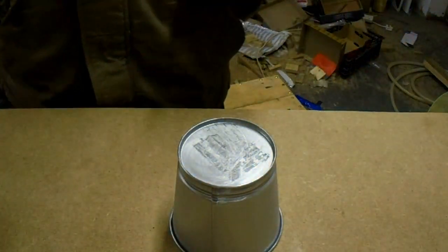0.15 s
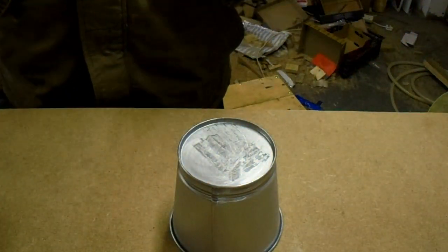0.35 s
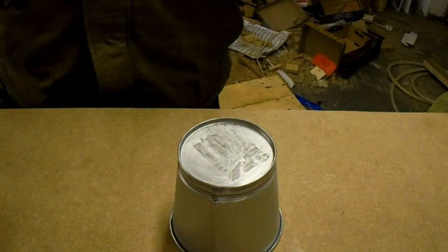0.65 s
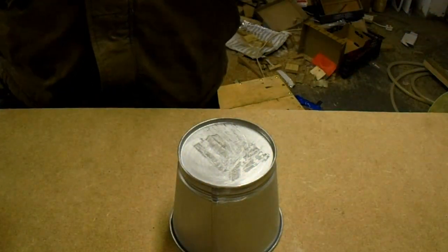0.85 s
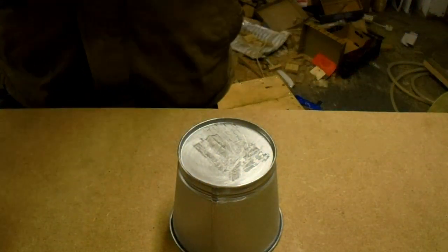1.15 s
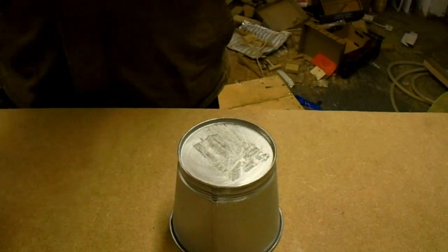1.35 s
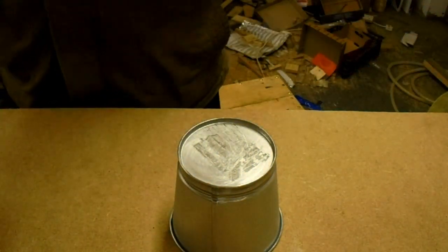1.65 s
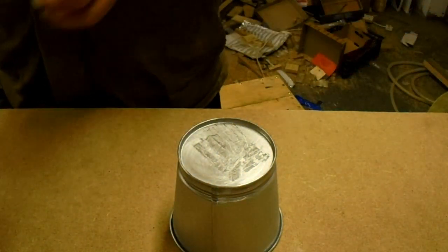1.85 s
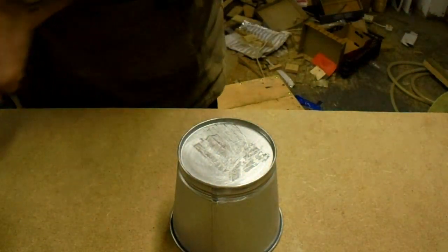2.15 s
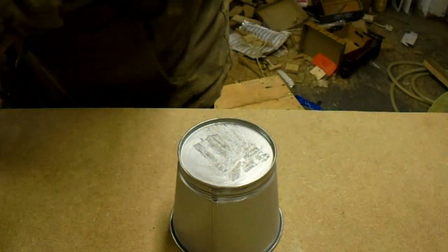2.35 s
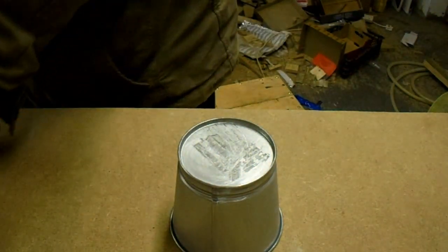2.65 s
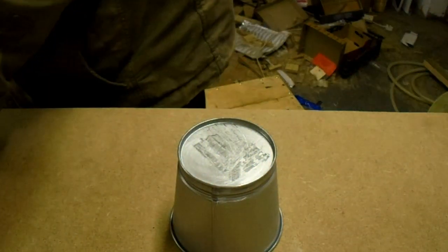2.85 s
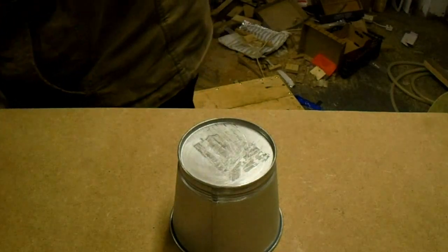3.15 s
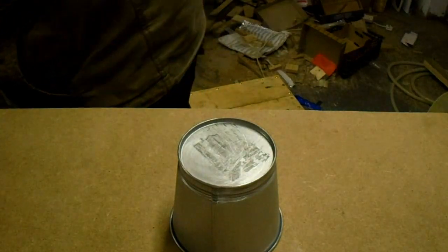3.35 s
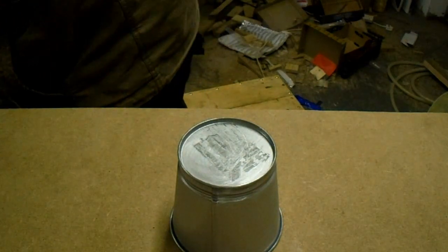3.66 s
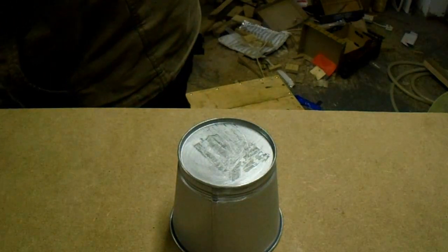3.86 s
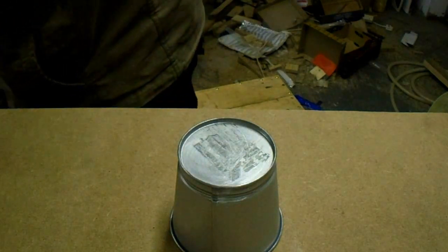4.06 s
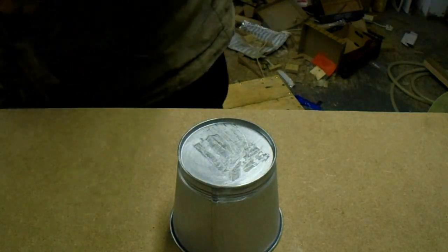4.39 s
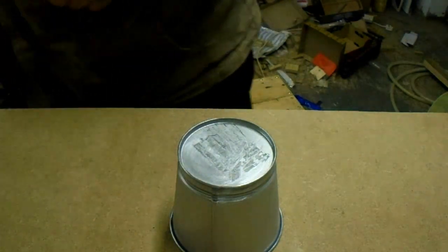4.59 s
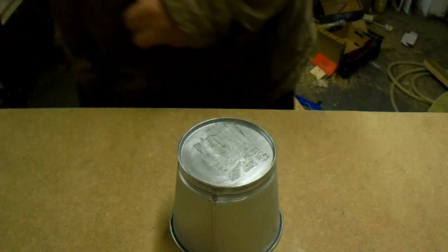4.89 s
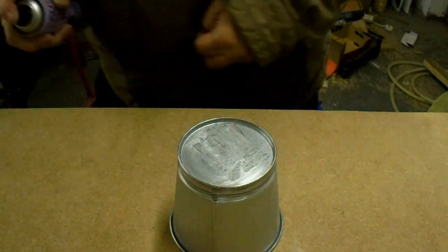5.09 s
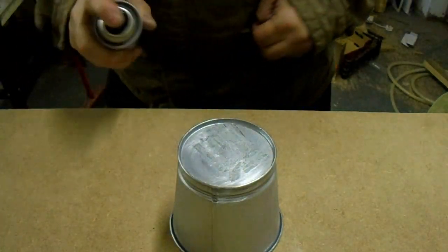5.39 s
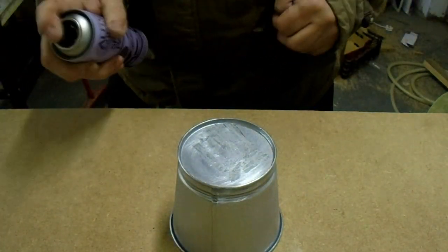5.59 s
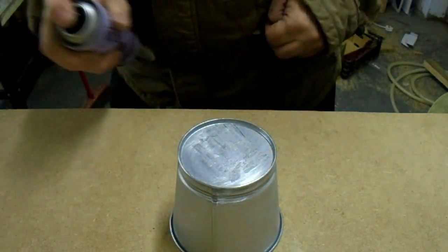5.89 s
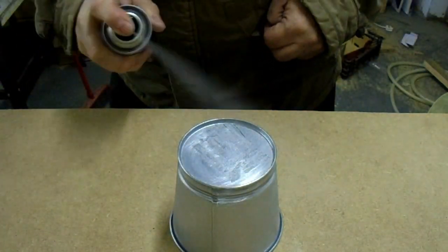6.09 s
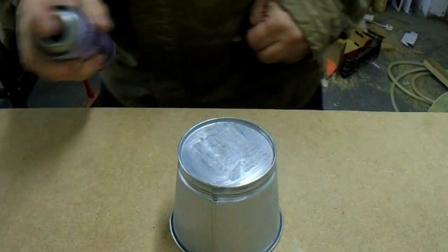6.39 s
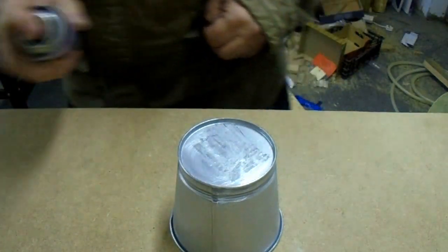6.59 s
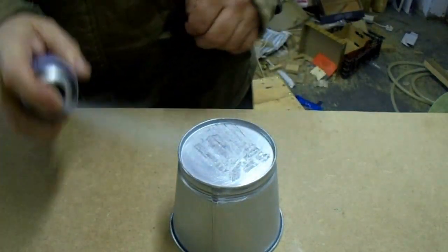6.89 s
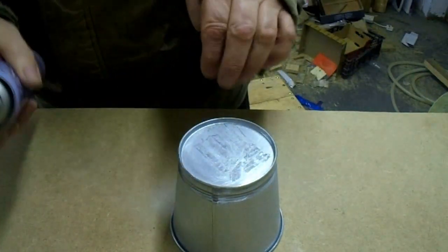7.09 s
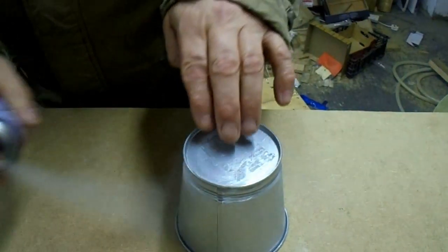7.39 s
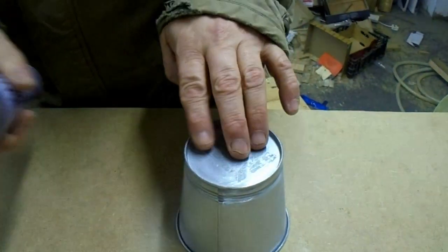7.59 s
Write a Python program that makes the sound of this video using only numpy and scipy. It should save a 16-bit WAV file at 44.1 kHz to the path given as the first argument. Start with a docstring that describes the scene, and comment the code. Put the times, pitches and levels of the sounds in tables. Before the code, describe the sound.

An aerosol paint can is shaken close to the microphone, its steel ball clacking, scraping and skittering unevenly through the paint. The can knocks against a wooden bench a few times. The shaking eases, the bench thuds and shudders, and three short, softer hisses of spray follow among scattered clicks. A low hum sits behind it all in a small workshop.

```python
"""A workshop, with the microphone close to an aerosol can and a low hum behind it.
The can is shaken from the start: its steel ball clacks, scrapes and skitters through the paint.
Near 1.5 s and again from 3.6 s the can is knocked on the bench, ringing the board. From 5.4 s the
shaking eases, the bench frame thuds and shudders, and after 6 s three short bursts of paint hiss out.
It is all heard through a small camera that samples at a low rate and joins the samples by straight lines."""
import sys
import numpy as np
from scipy import signal
from scipy.fft import rfft, irfft
from scipy.io import wavfile
from scipy.ndimage import uniform_filter1d

SR = 44100
rng = np.random.default_rng(int(sys.argv[2]) if len(sys.argv) > 2 else 0)


def int16_out(signal):
    """Quantize to a 16-bit WAV file."""
    q = np.round(np.clip(np.atleast_2d(signal).T, -1, 1) * 32767)
    wavfile.write(sys.argv[1], SR, q.astype(np.int16))


N = 341334

# The ball striking the can, close up. Each row: start in seconds, strength in dB, low wall modes in dB,
# high wall modes in dB, following clatter in dB relative to the strength.
BALL_BLOWS = [(0.0579, -4, -6, -13, -21), (0.0649, -5.5, -8, -7.5, -33), (0.0882, 4.5, -13, -10, -28),
              (0.0925, -5, -13, 1, -25), (0.1048, -1.5, -14, -10, -38), (0.1245, -5.5, -5, -20, -26),
              (0.1684, -4, -24, -14, -28), (0.185, -6, -11, -15, -25.5), (0.1952, -12, -15, -23, -30),
              (0.241, -14.5, 4, -21, -25), (0.2923, -22.5, 6, -20, -32), (0.3665, 7.5, -19, -9.5, -29),
              (0.3721, -5.5, -15, -3, -31), (0.4295, -5.5, -11.5, -11, -24), (0.445, -11, -18, -16, -32),
              (0.4946, -0.5, -12.5, -22.5, -28), (0.5019, -13, -10, -6, -35), (0.5861, -14, -2, -15, -26),
              (0.6636, 1, -16, -12, -21), (0.6757, 2, -13, -7.5, -32), (0.6896, -4.5, -16, 0, -25),
              (0.723, -3.5, -20, -15, -30.5), (0.7841, -5.5, -19, -15.5, -24), (0.8704, -29, -9, -24, -16),
              (0.9423, 2.5, -26, 1, -28.5), (0.9558, -1.5, -14, -2, -28.5), (0.996, -8, -27, -20, -29),
              (1.0306, -19, -18, -18, -27), (1.0719, -9.5, -24, -10, -23.5), (1.112, -22, -8, -25, -35),
              (1.1478, -25, -16.5, -18, -24), (1.1712, -23, 0, -25, -25), (1.2356, -22.5, -10, 0, -27),
              (1.2989, -12, -2.5, -23, -36), (1.3284, -22, -1, -31, -34), (1.4117, -27, -7, -26, -15),
              (1.4547, -12, -2, -2, -12), (1.4854, -5.5, -23, -18, -36), (1.5825, -17.5, -18, -15, -37),
              (1.6207, -24.5, -1, -8, -14), (1.8746, -27, -11, 2, -9), (1.9109, 2.5, -16, -5, -32),
              (1.9201, 2.5, -13, -3, -35), (1.9292, 3.5, -38, -12, -42), (1.9942, -1, -32, -29.5, -22),
              (2.0009, -5.5, -21, -18, -42), (2.0557, -18, -13, -5, -19), (2.1066, -24, 1, -25, -31),
              (2.1843, 0.5, -21, -10, -25.5), (2.2061, -7, -18, -7, -24), (2.2982, -8.5, -15, -11, -23),
              (2.3222, -4.5, -18, -20, -38), (2.3448, -14, -11, -18, -22), (2.4403, -17.5, -3, -9, -29),
              (2.4683, -24, -15, -9, -15), (2.4913, -13, -24, -7, -26), (2.509, -6.5, -26, -5, -33),
              (2.5153, -10, -24, -11, -27), (2.536, -13, -24, -20, -27), (2.5815, -9.5, -20, -27, -22),
              (2.5972, -8.5, -30, -19, -28), (2.6393, -21, -9, -18, -20), (2.656, -18.5, -11, -18, -22),
              (2.7715, 4.5, -19, -4, -38), (2.827, 0.5, -21, 5, -44), (2.843, -13, -7, -10, -32),
              (2.8537, -10, -15, -5, -37), (2.9116, -10, -21, -16, -20.5), (2.92, -15, -19, -24, -20),
              (3.1161, -5, -20, -11, -28), (3.1428, -12.5, -21, -1, -27), (3.271, -11.5, -27, 0, -27),
              (3.3322, -20, -18, -14, -22), (3.4031, -18, -20, -22, -16.5), (3.5952, -7.5, 13, -25, -30),
              (3.686, -15, -12, -10, -17), (3.726, -20.5, -3, -21, -16), (3.828, -20, -4, -18, -5),
              (3.8838, -14.5, -2, -24, -19), (4.069, -25, -12, -11, -27), (4.087, -10, -7, 0, -23),
              (4.1106, -7.5, -8, 7, -18.5), (4.2388, -11, -9, -5, -19), (4.342, -44, -16, -19, -29),
              (4.4104, -2, -34, -10, -25), (4.4323, -14, -21, -7, -36), (4.466, -0.5, -39, -9, -45),
              (4.527, -6, -31, -7.5, -35), (4.555, -18, -32, -17.5, -21), (4.6626, -9.5, -25, -14, -30),
              (4.6762, -11.5, -34, -14.5, -22.5), (4.742, -22.5, -10, -20.5, -27),
              (4.7905, -0.5, -28, 2, -38), (4.799, -1.5, -21, -10.5, -26), (4.826, -12, -23, -12, -29),
              (4.8746, -12, -31, -11.5, -27), (4.8898, -13, -24, -8, -30), (4.9152, -19.5, -23, -22, -28),
              (5.0068, -3.5, -24, -22, -27.5), (5.065, -25, -20, -21, -14), (5.2082, -12, -25, -10.5, -34),
              (5.2454, -23.5, -23, -17.5, -23), (5.3645, -9, -37, -17, -24.5), (5.3856, -19, -23, -22, -27),
              (5.44, -22, -24, -9.5, -23), (5.4824, -12, -38, -15, -41), (5.5305, -15.5, -23, -13.5, -33),
              (5.5565, -21, -25, -13, -28), (5.5766, -21, -25, -8.5, -35), (5.6003, -23.5, -33, -12, -23),
              (6.1519, -29.5, -30, -8, -29), (6.2358, -16.5, -26, -19, -25), (6.2925, -14.5, -23, -20, -26),
              (6.4168, -22, -18, -22, -27), (6.6518, -9.5, -17, -10.5, -24.5), (6.6816, -25, -27, -7, -30),
              (7.1227, -15, -16, -27, -39), (7.1584, -16, -21, -15, -27), (7.17, -10.5, -13, -25, -25),
              (7.2459, -16, -18, -17, -26.5), (7.2774, -36, -17, -9, -27), (7.2956, -23.5, -22, -6, -31),
              (7.3255, -21, -22, -27, -33), (7.3851, -30, -13, -31, -33), (7.417, -28, -14, -16, -21),
              (7.5953, -13.5, -27, -26, -31), (7.6266, -11, -22, -20, -26), (7.6852, -26, -9, -21, -27),
              (7.7308, -18.5, -27, -9, -27)]
# The can wall, damped by hand and paint. Each row: frequency in Hz, width in Hz, level in dB.
WALL_MODES = [(750, 500, -20), (1000, 500, -15), (1300, 550, -10), (1710, 550, -5), (2250, 800, -2),
              (2800, 800, 0), (3250, 900, 1), (3700, 1000, 4), (4280, 1000, 6), (4850, 1100, 7),
              (5350, 1100, 7)]
# Ball and paint sliding along the wall. Each row: time in seconds, level in dB.
SKITTER_LEVELS = [(0.03, -48), (0.27, -46.5), (0.89, -47.5), (1.14, -57.5), (1.5, -44.5), (1.65, -50),
                  (1.8, -57), (1.91, -42.5), (2.46, -52.5), (3.0, -42), (3.4, -44), (3.6, -48.5),
                  (3.78, -33), (3.91, -60.5), (4.2, -39.5), (4.9, -52.5), (5.25, -54), (5.42, -62),
                  (5.7, -62.5), (6.101, -78), (6.49, -46.5), (6.74, -69)]
# The tone of that sliding. Each row: frequency in Hz, level in dB.
SKITTER_SPECTRUM = [(210, -50), (350, -27.5), (860, -12), (954, -9.5), (1440, -9), (1680, -6.5),
                    (2540, -5.5), (4170, -5.5), (5500, -5.5), (7150, -41), (12100, -120)]
# Short scrapes inside the can. Each row: start in seconds, strength in dB, pitch in Hz.
CAN_SCRAPES = [(0.0654, -8, 1665), (0.0947, -25.5, 1620), (0.168, -18.5, 1280), (0.3638, -26, 1270),
               (0.4946, -16.5, 1790), (0.5864, -17, 1780), (0.6651, -20, 1740), (0.7826, -24.5, 1250),
               (0.87, -23, 1800), (1.241, -35.5, 2430), (1.3, -32, 2460), (1.36, -34.5, 2010),
               (1.4542, -14.5, 1060), (1.876, -19.5, 1930), (1.9934, -17.5, 1960), (2.127, -20.5, 1830),
               (2.174, -23, 1870), (2.2997, -20, 1930), (2.4398, -26, 1590), (2.5358, -20.5, 1350),
               (2.8267, -21, 1810), (3.279, -37, 2900), (3.41, -28, 2950), (3.5986, -9.5, 1320),
               (3.829, -15, 1320), (3.8875, -28, 1240), (4.069, -25.5, 1970), (4.1056, -21, 1155),
               (4.2393, -19.5, 2010), (4.4094, -21, 2300), (4.468, -24, 2210), (4.556, -22.5, 2140),
               (4.6628, -19.5, 2170), (4.796, -23, 2080), (5.008, -24.5, 2960), (5.365, -27.5, 2970),
               (5.483, -31.5, 2940)]
# Presses of the valve. Each row: start in seconds, length in seconds, level in dB.
SPRAY_BURSTS = [(6.143, 0.25, -36), (6.961, 0.2, -33), (7.409, 0.21, -32.5)]
# Nozzle and jet as they reach the microphone. Each row: frequency in Hz, level in dB.
JET_SPECTRUM = [(250, -16.5), (640, -22.5), (1200, -10), (1500, -17.5), (1900, -6.5), (2270, -2),
                (2700, -6.5), (3000, -8.5), (3200, -5), (3450, -14.5), (3720, -4), (4000, -9.5), (4400, -3),
                (4900, -4), (5400, -7), (6200, -22)]
# The can meeting the bench. Each row: start in seconds, strength in dB, pivot frequency in Hz,
# mode gain in dB per octave away from the pivot, after-shake T60 in seconds.
BENCH_KNOCKS = [(1.455, -7.5, 777, -29, 0.07), (1.486, -27, 1000, -8.5, 0.23),
                (3.593, -4.5, 900, 6.5, 0.41), (3.828, -4.5, 660, 5.5, 0.57), (3.887, -9, 710, 7, 0.74)]
# The bench top. Each row: frequency in Hz, width in Hz, level in dB.
BOARD_MODES = [(210, 290, -7.5), (303, 330, -9), (462, 120, 2), (659, 21, -9), (772, 125, 16.5),
               (900, 74, -25), (1155, 16, -4), (1320, 110, 8), (1870, 200, 1.5), (2360, 770, 12)]
# Dull thuds of the bench frame. Each row: start in seconds, strength in dB, pitch in Hz, T60 in seconds.
FRAME_THUDS = [(1.234, -36.5, 249, 0.51), (1.366, -32.5, 207, 0.57), (5.446, -36.5, 210, 0.69),
               (5.505, -40.5, 219, 0.4), (5.653, -35.5, 202, 0.31), (5.872, -35.5, 210, 0.28),
               (7.252, -29.5, 158, 0.14), (7.325, -26.5, 149, 0.47)]
# Shoves against the frame. Each row: start in seconds, level in dB.
FRAME_SHOVES = [(6.731, -15), (6.8, -28.5), (6.863, -29.5), (6.993, -35.5)]
# The frame's resonances. Each row: frequency in Hz, width in Hz, peak level in dB.
FRAME_MODES = [(155, 76, -11), (219, 28, -3), (270, 53, -7), (308.7, 11, 4), (382, 13, -33)]
# The frame's rattle. Each row: frequency in Hz, level in dB.
RATTLE_SPECTRUM = [(240, -35), (400, -5), (989, -8), (1120, -12), (1440, -18.5), (2750, -21.5),
                   (4000, -21.5), (5200, -26.5), (8800, -120)]
# The workshop's short echo. Each row: frequency in Hz, T60 in seconds.
ROOM_DECAY = [(300, 0.47), (1300, 0.15), (4000, 0.13)]
# Room tone behind the bench. Each row: frequency in Hz, level in dB.
AIR_SPECTRUM = [(5.9, -29.5), (10, -14.5), (59, 4), (97, -8.5), (133, 0.5), (238, -10.5), (326, -9.5),
                (460, -24.5), (615, -8.5), (913, -22), (989, -16), (1470, -24.5), (1770, -20), (4450, -28),
                (5500, -28), (7150, -69), (12100, -120)]
# The background hum. Each row: frequency in Hz, width in Hz, level in dB.
HUM_BANDS = [(58.6, 3.1, -54), (126, 10, -60)]


def ball_clacks(first_contact=5.8, middle_db=-15.5, bass_db=-26):
    """Close up, each blow is a sharp contact and a chatter of weaker ones, ringing the can wall."""
    out, t, hz = np.zeros(N), np.arange(800) / SR, np.transpose(WALL_MODES)[0]
    ring_t = t[:300]
    draws = rng.standard_normal((len(BALL_BLOWS), 2 * len(hz) + len(t)))
    for (start, db, low_db, high_db, _), draw in zip(BALL_BLOWS, draws):
        shade, detune, contacts = np.split(draw, [len(hz), 2 * len(hz)])  # each blow lands elsewhere
        mode_db = curve_at([(1400, low_db), (2800, middle_db), (4500, high_db)], hz) + 1.5 * shade
        modes = rings(WALL_MODES, ring_t, tuning=1 + .07 * detune)
        wall = ring_t * (gain_of(mode_db) @ modes)  # the wall takes a moment to swing
        chatter_ms = np.clip(2.1 + .04 * db, .2, 8)  # a harder blow chatters longer
        chatter = contacts * abs(contacts) * np.exp(-t * 1000 / chatter_ms)
        blow = np.convolve(wall, chatter + first_contact * (t == 0))
        add(out, start, peaking_at(db, blow))
    return highpass(out, hz=990) + gain_of(bass_db) * out  # a small object sends out little bass


def paint_skitter(ticks_per_s=900, spread_db=3.5, slosh_gain=0.76, clatter_t60_s=0.22):
    """The ball ticks unevenly through sloshing paint; every blow stirs up a clatter that dies away."""
    level = gain_of(np.interp(np.arange(N) / SR, *np.transpose(SKITTER_LEVELS)))
    t = np.arange(SR // 2) / SR
    for start, db, _, _, clatter_db in BALL_BLOWS:
        add(level, start, gain_of(db + clatter_db - 60 * t / clatter_t60_s))
    tick_sizes = gain_of(spread_db * np.minimum(rng.exponential(1, N), 3))
    ticks = tick_sizes * (rng.random(N) < ticks_per_s / SR)
    grains = uniform_filter1d(ticks, size=40) * rng.standard_normal(N)
    slosh = slosh_gain * rng.standard_normal(N)
    return level * coloured(evened(grains) + slosh, SKITTER_SPECTRUM)


def can_scrapes(width_hz=460):
    """Lumpy scraping noise rings the hollow of the can and dies away."""
    out, t = np.zeros(N), np.arange(9000) / SR
    draws = rng.standard_normal((len(CAN_SCRAPES), 2, len(t)))
    for (start, db, hz), (noise, roughness) in zip(CAN_SCRAPES, draws):
        lumps = abs(evened(uniform_filter1d(roughness, size=150)))
        fade_db_per_s = min(-800 - 21 * db, -70)  # weaker scrapes drag on longer
        drive = noise * lumps * gain_of(fade_db_per_s * t)
        hollow = t[:600] * rings([(hz, width_hz, 0)], t[:600])[0]  # one resonance applied twice
        add(out, start, peaking_at(db, excite(drive, hollow)))
    return out


def paint_spray(sputter_db=1.5, patchy_db=2.5, open_s=0.045, shut_t60_s=0.16):
    """The jet sputters quickly; its colour drifts in patches as the can sweeps past the microphone."""
    valve, t = np.zeros(N), np.arange(SR // 2) / SR
    for start, length, db in SPRAY_BURSTS:
        shut_db = -60 * np.maximum(t - length, 0) / shut_t60_s
        add(valve, start, np.minimum(t / open_s, 1) * gain_of(db + shut_db))
    sputter = evened(uniform_filter1d(rng.standard_normal(N), size=150))
    jet = coloured(gain_of(sputter_db * sputter) * rng.standard_normal(N), JET_SPECTRUM)
    bands = signal.stft(jet, nperseg=256)[2]
    drift = uniform_filter1d(rng.standard_normal(bands.shape), size=30)
    patches = evened(uniform_filter1d(drift, size=2, axis=0))
    return valve * signal.istft(bands * gain_of(patchy_db * patches), nperseg=256)[1][:N]


def bench_knocks(contact_ms=14.7, first_contact=9.1):
    """The can hits the bench: a brief blow and a rattling after-shake drive the board's modes."""
    out, t, hz = np.zeros(N), np.arange(9000) / SR, np.transpose(BOARD_MODES)[0]
    for start, db, pivot_hz, db_per_octave, t60 in BENCH_KNOCKS:
        board = gain_of(db_per_octave * abs(np.log2(hz / pivot_hz))) @ rings(BOARD_MODES, t)
        shake = np.exp(-t * 1000 / contact_ms) + 0.23 * gain_of(-60 * t / t60)
        drive = shake * rng.standard_normal(len(t)) + first_contact * (t == 0)
        add(out, start, peaking_at(db, excite(drive, board)))
    return out


def frame_shudder(rise_s=0.023, t60_s=0.27, rattle_db=-9.5):
    """Each shove sets the bench frame rumbling in its modes, with a dull rattle on top."""
    level, t = np.zeros(N), np.arange(SR // 2) / SR
    for start, db in FRAME_SHOVES:
        fade_db = -60 * np.maximum(t - rise_s, 0) / t60_s
        add(level, start, np.minimum(t / rise_s, 1) * gain_of(db + fade_db))
    widths_hz = np.transpose(FRAME_MODES)[1]
    frame = widths_hz @ rings(FRAME_MODES, np.arange(8000) / SR)
    rumble = evened(excite(rng.standard_normal(N), frame))
    rattle = gain_of(rattle_db) * coloured(rng.standard_normal(N), RATTLE_SPECTRUM)
    return level * (rumble + rattle)


def frame_thuds(width_hz=90):
    """A push rings one low, broad resonance of the frame, and noise lingers in it."""
    out, t = np.zeros(N), np.arange(16000) / SR
    for start, db, hz, t60 in FRAME_THUDS:
        drive = 0.086 * gain_of(-60 * t / t60) * rng.standard_normal(len(t))
        drive[0] = 1  # the push
        frame = rings([(hz, width_hz, 0)], t)[0]
        add(out, start, peaking_at(db, excite(drive, frame)))
    return out


def workshop_echo(direct, delay_s=.004, level_db=-10):
    """Reflections reach the microphone just after the direct sound; the bass lingers longest."""
    hz, t, bands = signal.stft(rng.standard_normal(SR // 2), SR, nperseg=256)
    decay = gain_of(-60 * t / curve_at(ROOM_DECAY, hz)[:, None])
    tail = signal.istft(bands * decay, SR, nperseg=256)[1]
    tail = np.concatenate([np.zeros(round(delay_s * SR)), tail])
    return gain_of(level_db) * excite(direct, tail / np.linalg.norm(tail))


def room_tone(air_db=-51.5):
    """In the background, steady room noise and two narrow noise bands that make a wavering hum."""
    t = np.arange(SR // 2) / SR
    hums = [evened(excite(rng.standard_normal(N), ring)) for ring in rings(HUM_BANDS, t)]
    air = gain_of(air_db) * coloured(rng.standard_normal(N), AIR_SPECTRUM)
    return air + gain_of(np.transpose(HUM_BANDS)[2]) @ hums


def rings(modes, t, tuning=1):
    """One decaying sine a mode, its frequency multiplied by tuning."""
    hz, width, db = np.transpose(modes)[:, :, None]
    tuned_hz = hz * np.reshape(tuning, (-1, 1))
    return gain_of(db) * np.exp(-np.pi * width * t) * np.sin(2 * np.pi * tuned_hz * t)


def excite(drive, response):
    """Plays a drive through an impulse response, keeping the drive's length."""
    return signal.fftconvolve(drive, response)[:len(drive)]


def coloured(x, spectrum):
    """Filters by a spectrum table, silent outside it, and scales to rms 1."""
    hz = np.fft.rfftfreq(len(x), 1 / SR)
    inside = (hz >= spectrum[0][0]) & (hz <= spectrum[-1][0])
    return evened(irfft(rfft(x) * gain_of(curve_at(spectrum, hz)) * inside, len(x)))


def highpass(x, hz):
    """Steep bass cut."""
    return signal.sosfilt(signal.butter(4, hz, "high", fs=SR, output="sos"), x)


def curve_at(points, hz):
    """Reads a table on a log-frequency axis."""
    point_hz, values = np.transpose(points)
    return np.interp(np.log(hz + 1), np.log(point_hz + 1), values)


def gain_of(db):
    """Decibels to gain."""
    return 10 ** (np.asarray(db) / 20)


def evened(x):
    """Scales to rms 1."""
    return x / np.sqrt(np.mean(x ** 2) + 1e-20)


def peaking_at(db, x):
    """Scales the peak to db."""
    return gain_of(db) * x / abs(x).max()


def add(mix, start_s, sound):
    """Mixes a sound in at its start time."""
    part = mix[round(start_s * SR):][:len(sound)]
    part += sound[:len(part)]


def scene():
    """At one microphone: can and bench close by, their echo and the room tone behind."""
    direct = ball_clacks() + highpass(bench_knocks(), hz=150)
    direct += paint_skitter() + can_scrapes() + paint_spray()
    direct += highpass(frame_shudder() + frame_thuds(), hz=135)
    return (direct + workshop_echo(direct) + room_tone())[None]


def record(dry, step=4, input_band_hz=5600, ceiling=.9, output_band_hz=15950):
    """The camera joins every fourth sample by straight lines, mirroring the spectrum into the treble."""
    samples = np.arange(N)
    narrowed = signal.oaconvolve(dry[0], signal.firwin(255, input_band_hz, fs=SR), "same")
    rounded = ceiling * np.tanh(narrowed / ceiling)  # the input stage rounds off the loudest peaks
    joined = np.interp(samples, samples[::step], rounded[::step])
    band_limit = signal.firwin(511, output_band_hz, window=("kaiser", 12), fs=SR)
    return signal.oaconvolve(joined, band_limit, "same")[None]


dry = scene()
out = record(dry)
int16_out(out)
```